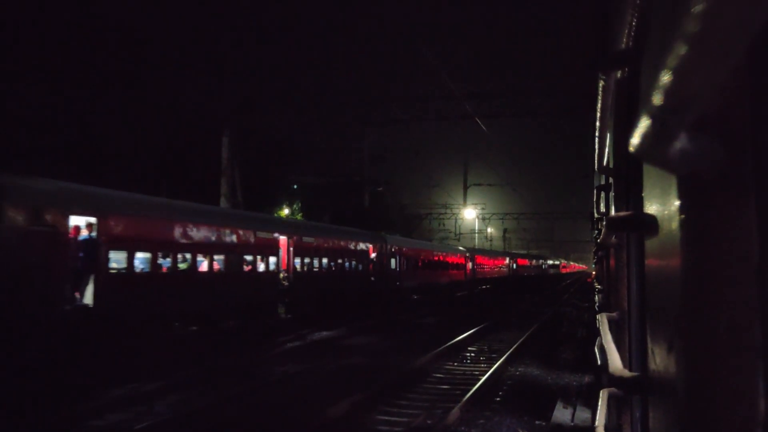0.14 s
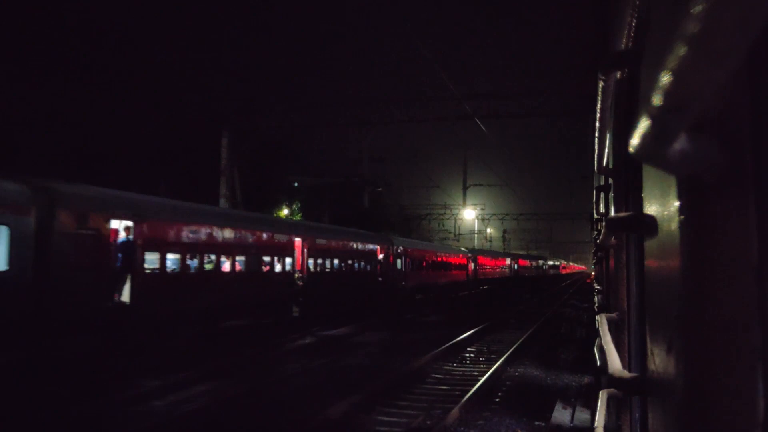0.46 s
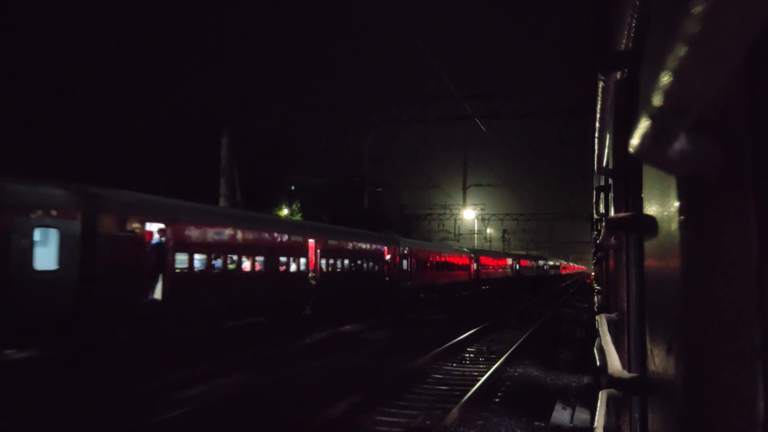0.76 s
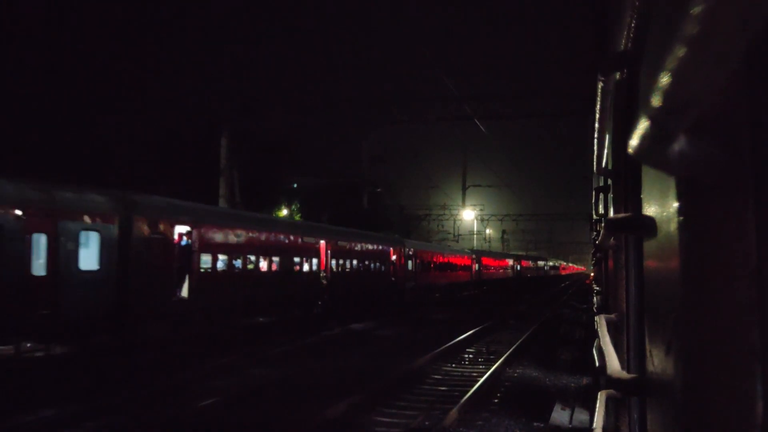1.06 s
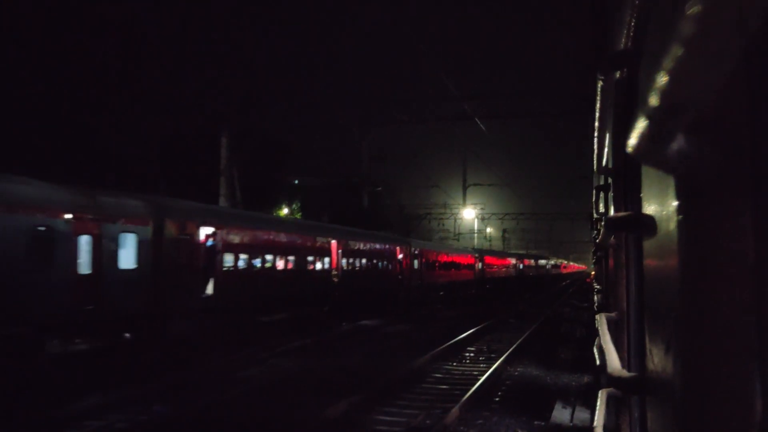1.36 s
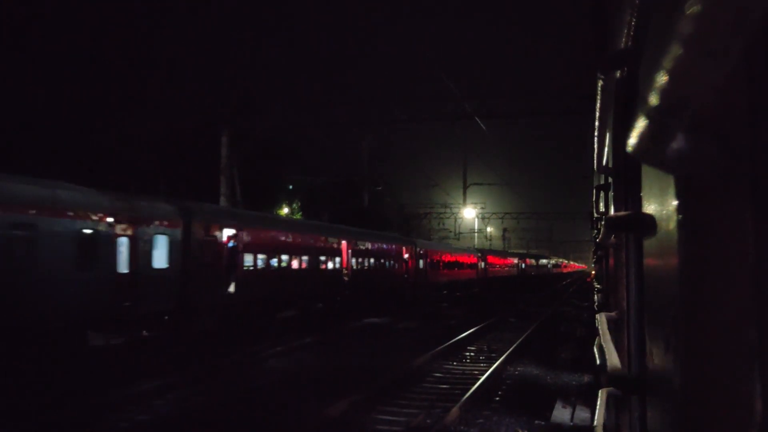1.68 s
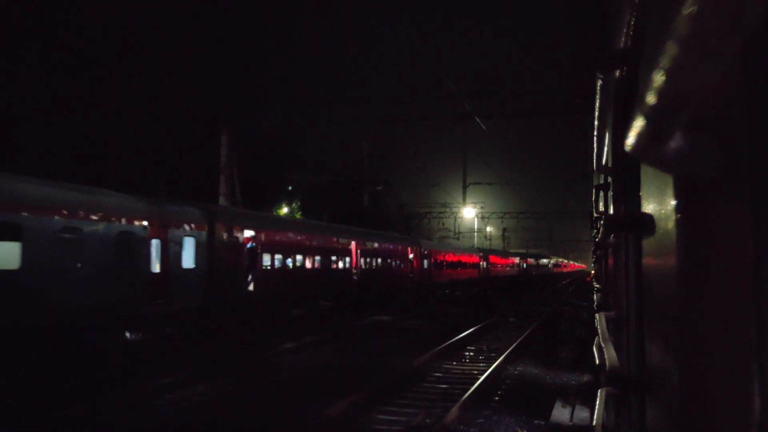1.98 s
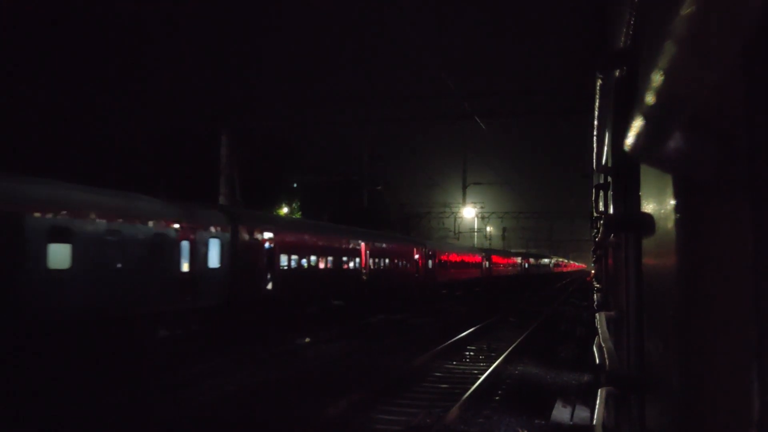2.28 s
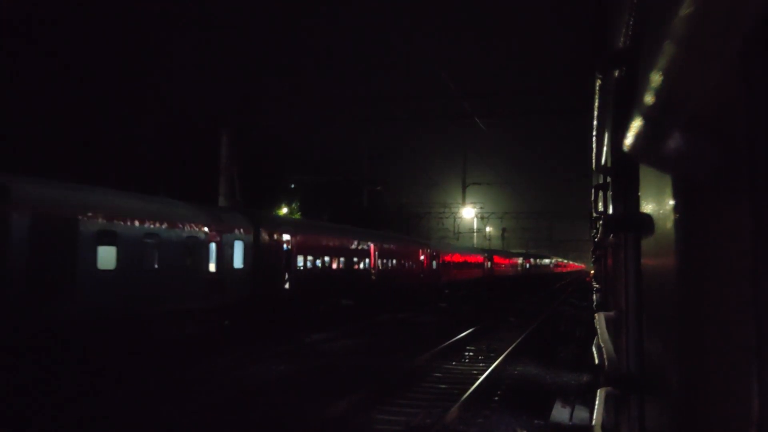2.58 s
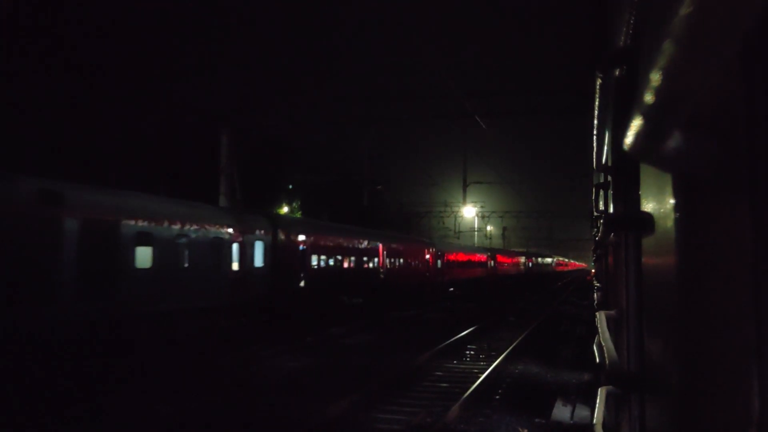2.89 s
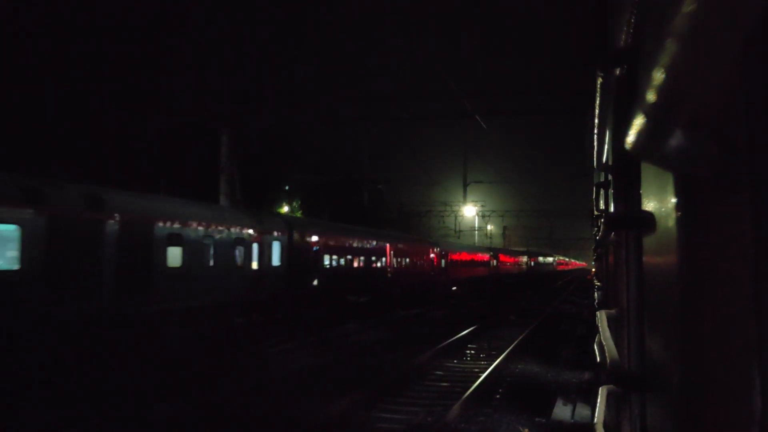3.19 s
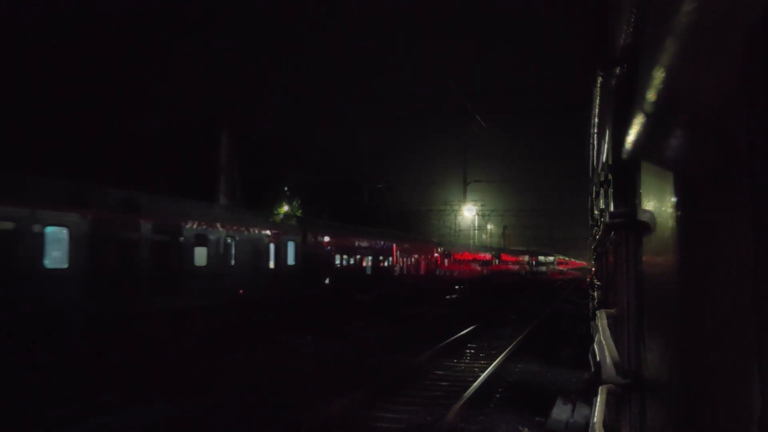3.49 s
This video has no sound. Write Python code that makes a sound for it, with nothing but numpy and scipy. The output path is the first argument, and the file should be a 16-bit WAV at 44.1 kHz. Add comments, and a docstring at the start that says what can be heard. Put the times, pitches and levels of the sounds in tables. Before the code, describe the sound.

Continuous diesel engine throb at nearly constant speed, wrapped in broad roar and airy hiss; a hollow low growl grows stronger in the second half. Open rail yard at night, small mono microphone on a train.

```python
"""Diesel engine beside a rolling coach

A diesel engine drones at a nearly steady speed on a neighbouring track while the listener's coach rolls
slowly past. Its shaft orders are summed cosines, over filtered noise for the exhaust roar and fan hiss.
Noise in two sliding resonances adds a low growl and a hissy ring.
Shifting reflections swell and fade the sound, drawn as level curves and random wander."""
import sys
import numpy as np
from scipy import signal
from scipy.fft import rfft, irfft
from scipy.io import wavfile
from scipy.ndimage import uniform_filter1d

SR = 44100
rng = np.random.default_rng(int(sys.argv[2]) if len(sys.argv) > 2 else 0)


def store_pcm(level_fs):
    """Save levels as 16-bit WAV."""
    pcm = np.round(np.clip(level_fs, -1, 1) * 32767).astype(np.int16)
    wavfile.write(sys.argv[1], SR, np.atleast_2d(pcm).T)


def ratio_of_db(decibels):
    """Turn decibels (scalar or array-like) into linear amplitude factors; 0 dB maps to 1."""
    return 10 ** (np.asarray(decibels, float) / 20)


N = 160965

# Shaft speed and strong orders. Each row: start in seconds, shaft speed in Hz, then the level in dB
# of each order in LEADING_ORDERS, before its waver.
ENGINE_CURVE = [(0.0, 25.17, -27.5, -26.0, -43, -27, -31.5, -37.5, -28, -30.5, -28.5, -36.0),
                (0.2, 25.17, -29.0, -25.0, -37.5, -28.5, -29.5, -29, -26, -26.5, -42.0, -32),
                (0.41, 25.16, -27.5, -22.5, -34.0, -26.5, -40, -34, -24, -32.5, -34.5, -37.5),
                (0.61, 25.16, -27, -29, -37, -32.5, -34.5, -26, -27, -36, -38.5, -36),
                (0.81, 25.14, -26, -27.0, -33, -34.5, -27.5, -27.5, -28.5, -33.5, -43, -36.5),
                (1.01, 25, -28.0, -24.5, -35.5, -40.5, -29.5, -28.5, -27, -33.0, -47, -35.5),
                (1.22, 25.06, -27.5, -26, -31, -42, -31.5, -27.0, -30.0, -33, -36.5, -25.5),
                (1.42, 25.01, -29.5, -20.5, -31.5, -26, -26.5, -30.5, -29.5, -38.5, -33, -27.5),
                (1.62, 25.02, -29.5, -24.0, -36.5, -26.5, -35.5, -23.5, -30, -48.5, -32, -23),
                (1.82, 24.99, -30.5, -25.0, -27, -25, -36.5, -26.5, -39.0, -39, -31.5, -26),
                (2.03, 24.85, -27.5, -22.0, -32.0, -30.5, -32.5, -32, -40.5, -37, -40, -29),
                (2.23, 24.95, -27, -20.5, -34, -36, -29.5, -27.5, -32.0, -41.5, -42.5, -34.5),
                (2.43, 24.93, -26.0, -27, -32.5, -37.5, -35.5, -28, -31, -38, -46.0, -35),
                (2.64, 25.03, -26.5, -21, -34.5, -32, -31.5, -28.5, -30.5, -51, -42, -40.0),
                (2.84, 24.92, -28, -17.5, -45, -31.0, -37, -37.0, -41.5, -36, -43, -47.5),
                (3.04, 24.95, -27, -19.5, -45.5, -32.5, -30.5, -26, -34, -43, -33.5, -44),
                (3.24, 24.97, -28, -19, -42, -36.0, -29, -27.0, -40.5, -38, -40, -46.5),
                (3.45, 24.87, -30.5, -16.5, -38.5, -34.5, -33, -33, -33, -37, -39, -47.5),
                (3.65, 24.84, -25, -16.5, -32.5, -32, -34.5, -42, -32.5, -46.5, -49.5, -39.5)]
# Strong orders, in multiples of the shaft speed.
LEADING_ORDERS = (3, 6, 7, 16, 17, 19, 20, 22, 23, 25)
# Weaker orders that swell with a strong one. Each row: order, level in dB against its leader, leading order.
FOLLOWING_ORDERS = [(18, -10, 17), (24, -28, 25), (26, -16, 25), (27, -15.5, 25), (28, -11.5, 20)]
# Orders of steady mean level. Each row: order, level in dB before its waver.
STEADY_ORDERS = [(1, -46.5), (2, -51.5), (4, -45.5), (4.5, -41), (5, -58.5), (8, -42.5), (9, -41.5),
                 (10, -38), (11, -42), (12, -43.5), (13, -36), (14, -40), (15, -57)]
# Spectral shape of the roar. Each row: frequency in Hz, relative density in dB per Hz.
ROAR_SPECTRUM = [(20, -24.5), (38, -34.5), (60, -24.5), (90, -16), (125, -11), (165, -7.5), (200, -7),
                 (290, -8), (400, -7), (500, -5.5), (630, -9.5), (750, -15.5), (990, -13), (1310, -19),
                 (1640, -20), (2100, -23.5), (2500, -23), (3160, -21), (4000, -26.5), (5360, -31.5),
                 (6550, -25), (7430, -31.5), (8220, -58), (10700, -88.5)]
# Swells of the roar. Each row: start in seconds, then the level in dB of each band in BAND_CENTRES_HZ;
# only the departure from each band's mean power counts.
BAND_SWELLS = [(0.0, -31, -22.5, -35, -35, -39, -33.5, -44.5, -39),
               (0.05, -26, -17.5, -32, -29.5, -36.5, -33.5, -41, -39.5),
               (0.44, -32.5, -26, -33.5, -34.5, -40, -39.5, -44, -43),
               (0.63, -35, -23, -36, -35.5, -41.5, -37.5, -45.5, -43.5),
               (0.98, -32, -27, -34.5, -37.5, -39, -39.5, -45.5, -43),
               (1.46, -30.5, -21.5, -32, -35, -37, -36.5, -39.5, -41),
               (1.91, -26, -23.5, -30, -31, -34.5, -32.5, -39, -37),
               (2.06, -32, -25, -36.5, -34.5, -39.5, -36, -42.5, -42.5),
               (2.46, -30.5, -27, -31.5, -33, -34.5, -36, -38.5, -38),
               (2.63, -28, -32, -33.5, -32, -35.5, -32.5, -40, -40),
               (2.81, -33.5, -28.5, -34.5, -33.5, -37.5, -34, -39.5, -38.5),
               (2.87, -27, -29, -31.5, -34, -40, -34.5, -38.5, -39.5),
               (2.9, -38, -35.5, -43, -37, -38, -34.5, -47, -38.5),
               (2.92, -30.5, -30.5, -35.5, -29.5, -38, -34, -41, -42.5),
               (3.09, -28, -26.5, -34, -33, -35, -35, -39, -39.5),
               (3.25, -26.5, -27.5, -32.5, -32.5, -35, -33, -35.5, -39),
               (3.61, -27.5, -27, -37.5, -32, -38.5, -34.5, -42, -41),
               (3.65, -30.5, -36.5, -42, -41, -41.5, -38, -44.5, -43.5)]
# Centres of those bands, in Hz.
BAND_CENTRES_HZ = (320, 500, 700, 1050, 1700, 2900, 4400, 6500)
# Boom of a hollow panel or wheel rumble. Each row: start in seconds, centre in Hz, level in dB.
GROWL_CURVE = [(0.0, 239.6, -32.5), (0.08, 256.7, -33), (0.14, 216.1, -32.5), (0.3, 251.4, -40.5),
               (0.33, 233, -29.5), (0.61, 260.0, -41), (0.75, 220.9, -35), (1.13, 238.1, -35.5),
               (1.2, 219.5, -37), (1.36, 250, -33), (1.43, 214, -30.5), (1.48, 248.5, -36.5),
               (1.7, 223.8, -25), (1.78, 251.8, -26.5), (1.87, 222.8, -24.5), (2.02, 237.2, -26.5),
               (2.09, 220, -35.5), (2.23, 249.1, -29), (2.32, 226.6, -34.5), (2.65, 247.0, -25.5),
               (3.03, 220.5, -28), (3.13, 257, -24), (3.2, 229.3, -28.5), (3.65, 234, -26)]
# Ring in the rush of air. Each row: start in seconds, centre in Hz, level in dB.
RING_CURVE = [(0, 2448, -40), (.4, 2510, -41.5), (1, 2906, -49), (1.5, 3050, -39), (1.8, 3050, -41),
              (2.2, 2898, -46.5), (2.75, 2952, -42.5), (3.3, 3406, -42), (3.65, 3100, -44.5)]

# Waver of the orders: nominal rate, rms level and phase swings, and the frequency where they are full
WAVER_HZ, WAVER_DB, WAVER_RAD, WAVER_FULL_HZ = 5, 2, 0.59, 400
ROAR_DB = -22.5  # rms before the firing puffs
PATCH_DB, FLICKER_DB = 0.95, 0.87  # rms; flicker is full from 2500 Hz up
FIRING_DEPTH, FIRING_FROM_HZ, FIRINGS_PER_TURN = 0.1, 710, 3
GROWL_POLE_HZ, RING_POLE_HZ = 18.6, 370  # bandwidth of each of two cascaded poles
MIC_LOW_HZ, SOFT_CLIP = 30.4, 0.6  # high-pass corner; ceiling amplitude


def evened(x):
    """Normalisation: divide a signal by its root mean square."""
    return x / np.sqrt(np.mean(x ** 2) + 1e-20)


def column(table, index, t):
    """Linear interpolation: one column of a curve table at the times t."""
    rows = np.array(table)
    return np.interp(t, rows[:, 0], rows[:, index])


def wander(rate_hz, t):
    """Superposition: slow sines of random phase, weaker as they quicken, sum to a wander of rms 1."""
    coarse = t[::256]
    hz = np.geomspace(rate_hz / 8, rate_hz * 3, num=12)[:, None]
    sines = np.sin(2 * np.pi * (hz * coarse + rng.random(hz.shape)))
    slow = (sines / np.sqrt(hz)).sum(0)
    return np.interp(t, coarse, evened(slow))


def orders(t, turns):
    """Fourier series: each firing is a pulse, so strong orders run nearly in step; steady weak ones lag at random."""
    lead = {k: column(ENGINE_CURVE, 2 + i, t) for i, k in enumerate(LEADING_ORDERS)}
    in_step = list(lead.items())
    in_step += [(k, db + lead[of]) for k, db, of in FOLLOWING_ORDERS]
    rows = [(k, db, 0) for k, db in in_step]
    rows += [(k, db, 2 * np.pi * rng.random()) for k, db in STEADY_ORDERS]
    out = np.zeros(N)
    for k, db, lag in rows:
        # higher orders waver more
        share = min(k * ENGINE_CURVE[0][1] / WAVER_FULL_HZ, 1) ** 2
        swing_db = share * WAVER_DB * wander(WAVER_HZ, t)
        drift = share * WAVER_RAD * wander(WAVER_HZ, t)
        phase = 2 * np.pi * k * turns + drift - lag
        out += np.sqrt(2) * ratio_of_db(db + swing_db) * np.cos(phase)
    return out


def roar(turns):
    """Amplitude modulation: exhaust and fan noise, patchy and swelling by band, its top puffing with each firing."""
    frames = N // 256 + 5
    hz = np.fft.rfftfreq(1024, 1 / SR)
    t = np.arange(frames) * 256 / SR
    real, imag, patches = rng.standard_normal((3, len(hz), frames))
    patches = uniform_filter1d(patches, size=6, axis=0)
    patches = evened(uniform_filter1d(patches, size=24, axis=1))
    flicker = evened(uniform_filter1d(rng.standard_normal(frames), size=4))
    flicker = flicker * np.minimum(hz / 2500, 1)[:, None]

    swell = np.array([column(BAND_SWELLS, 1 + i, t) for i in range(len(BAND_CENTRES_HZ))])
    swell -= 10 * np.log10(np.mean(ratio_of_db(2 * swell), 1))[:, None]  # mean power 1 in each band
    log_hz, log_centres = np.log(hz + 1), np.log(BAND_CENTRES_HZ)
    swell = np.array([np.interp(log_hz, log_centres, s) for s in swell.T]).T
    z = (real + 1j * imag) * ratio_of_db(swell + PATCH_DB * patches + FLICKER_DB * flicker)
    uncoloured = signal.istft(z, nperseg=1024, noverlap=768)[1][:N]

    f, db = np.transpose(ROAR_SPECTRUM)
    colour_db = np.interp(np.log(np.fft.rfftfreq(N, 1 / SR) + 1), np.log(f + 1), db)
    noise = ratio_of_db(ROAR_DB) * evened(irfft(rfft(uncoloured) * ratio_of_db(colour_db), N))
    top = signal.sosfilt(signal.butter(2, FIRING_FROM_HZ, "high", fs=SR, output="sos"), noise)
    puffs = np.cos(2 * np.pi * FIRINGS_PER_TURN * turns)
    return noise + FIRING_DEPTH * puffs * top


def ringing(curve, pole_hz, t):
    """Resonance: low-passed complex noise, turned by a sliding carrier, rings around its centre."""
    carrier = np.exp(2j * np.pi * np.cumsum(column(curve, 1, t)) / SR)
    r = np.exp(-np.pi * pole_hz / SR)
    slow = rng.standard_normal(N) + 1j * rng.standard_normal(N)
    for _ in range(2):
        slow = signal.lfilter([1 - r], [1, -r], slow)
    return ratio_of_db(column(curve, 2, t)) * evened((slow * carrier).real)


def growl(t):
    """Narrow resonance: a hollow panel or wheel rumble booms under the coach."""
    return ringing(GROWL_CURVE, GROWL_POLE_HZ, t)


def air_ring(t):
    """Broad resonance: a hissy ring in the rush of air slides as reflections shift."""
    return ringing(RING_CURVE, RING_POLE_HZ, t)


def scene():
    """Superposition: engine orders, roar, growl and ring add in one channel."""
    t = np.arange(N) / SR
    turns = np.cumsum(column(ENGINE_CURVE, 1, t)) / SR
    return (orders(t, turns) + roar(turns) + growl(t) + air_ring(t))[None]


def roll_off(x):
    """The treble ends steeply here."""
    return signal.sosfilt(signal.butter(12, 8370, fs=SR, output="sos"), x)


def record(dry):
    """Saturation: a small microphone without deep bass rounds off the peaks."""
    x = signal.sosfilt(signal.butter(2, MIC_LOW_HZ, "high", fs=SR, output="sos"), dry)
    mix = SOFT_CLIP * np.tanh(x / SOFT_CLIP)
    return roll_off(mix)


dry = scene()
out = record(dry)
store_pcm(out)
```